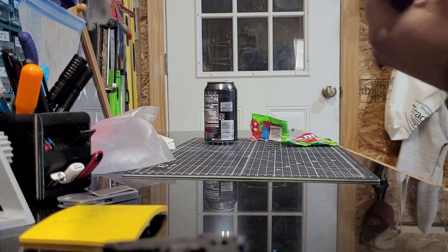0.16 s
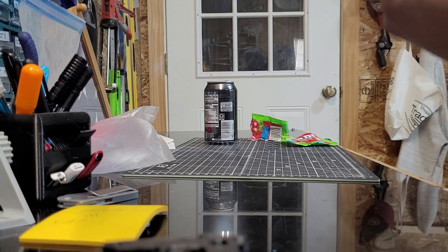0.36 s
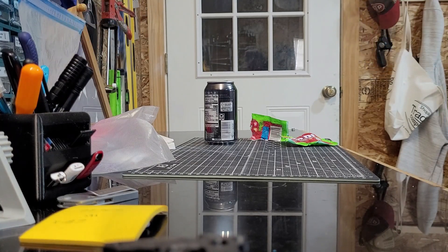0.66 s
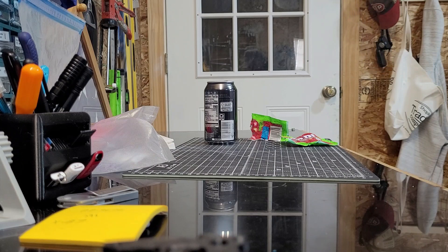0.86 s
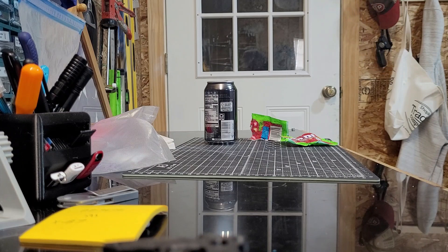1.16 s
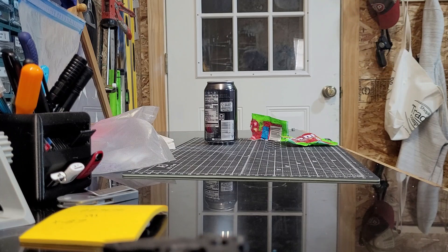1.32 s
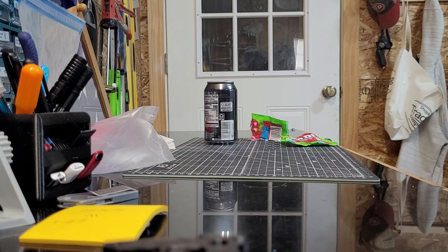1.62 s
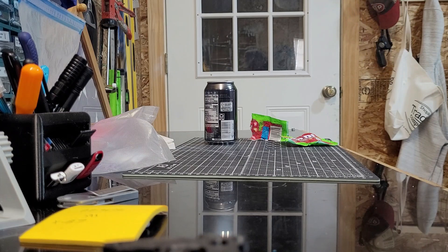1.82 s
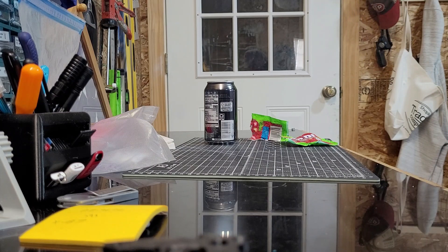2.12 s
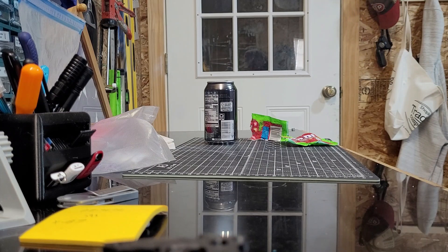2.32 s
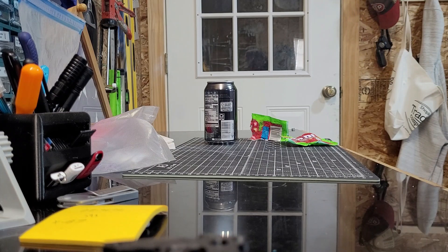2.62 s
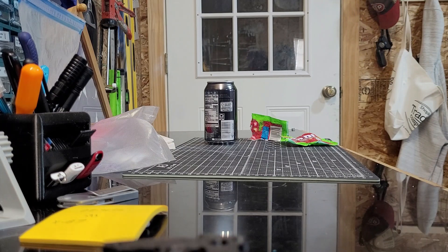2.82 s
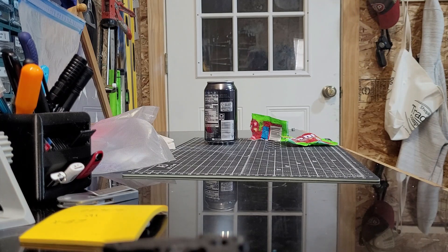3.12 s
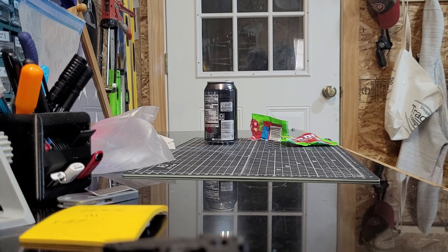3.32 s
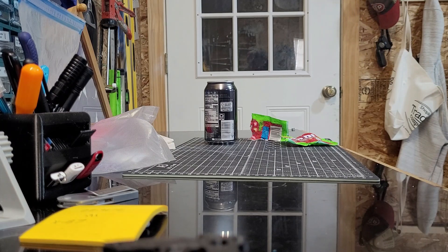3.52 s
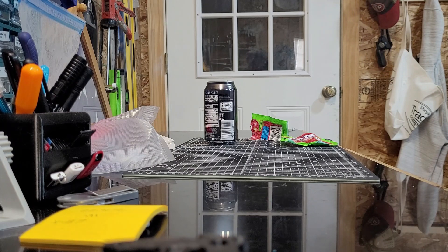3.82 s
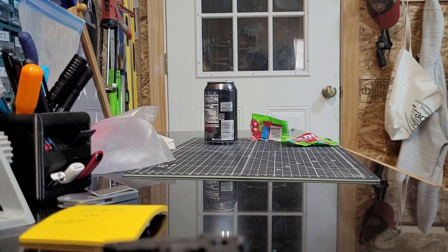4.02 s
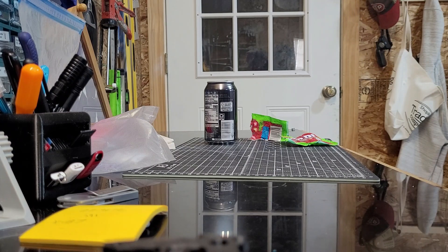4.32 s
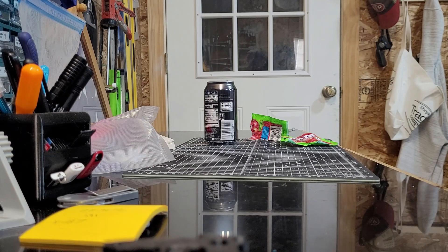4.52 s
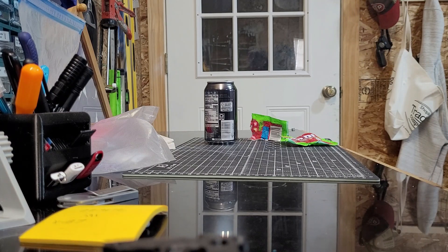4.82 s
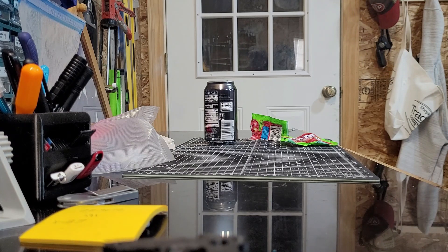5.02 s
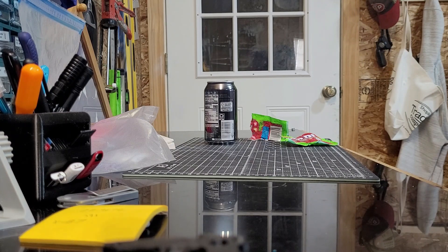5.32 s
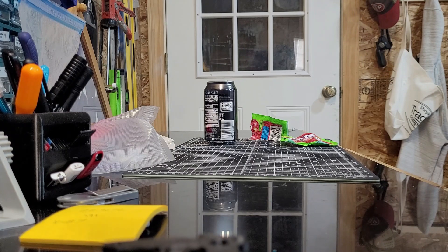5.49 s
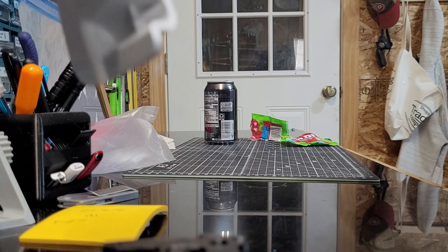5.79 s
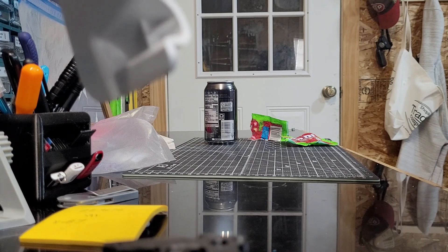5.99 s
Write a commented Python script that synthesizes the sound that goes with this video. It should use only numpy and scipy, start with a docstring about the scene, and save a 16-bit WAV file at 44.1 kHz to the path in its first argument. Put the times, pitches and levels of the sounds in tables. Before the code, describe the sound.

A steady low appliance drone fills a garage. Close by, fingers hiss faintly over smooth plastic and small sticky ticks come loose. A light plastic knock with a soft shelf thud comes early, then a few weaker taps at intervals. After a quiet spell, a tight burst of contacts snaps the bracket in place, by far the loudest event, with a short garage ring. Close stereo microphone.

```python
"""Hands turn a plastic bracket about and press it onto a shelf in a garage, heard from close by.
Over the drone of an appliance, shaped noise throughout, fingers slide on the plastic (hiss bursts)
and small sticky ticks come loose (short bright modes). From 1.2 s the bracket knocks on the shelf,
chatter ringing its modes, and near 5.9 s a dense run of contacts snaps it home loudly.
Sparse decaying reflections let the garage ring after each blow."""
import sys
import numpy as np
from scipy import signal
from scipy.fft import irfft
from scipy.io import wavfile
from scipy.ndimage import uniform_filter1d

SR = 44100
rng = np.random.default_rng(int(sys.argv[2]) if len(sys.argv) > 2 else 0)


def dump(signal):
    """Clip the signal to [-1, 1] and save it as 16-bit WAV at the path in sys.argv[1]."""
    limited = np.clip(np.atleast_2d(signal).T, -1, 1)
    pcm = np.round(limited * 32767).astype(np.int16)
    wavfile.write(sys.argv[1], SR, pcm)


N = 271215

# middles of the thud, shell, ribs and edges bands as the walls hear them: f/Hz
BANDS_HZ = [450, 1250, 3300, 10000]
PIVOT_HZ = 1210  # the brightness of a blow turns about this pitch


def blows():
    """At each contact a short chatter of tiny impacts rings the bracket, and one push thuds the shelf.

    The walls hear the part from all sides, so the room is also fed a click of smooth colour.
    """
    # blows on the bracket: t/s, strength/dB, shelf thud/dB, brightness/(dB per octave),
    # favoured pitch f/Hz, lean to the left/dB, room share/dB
    contacts = [(1.2315, -46.5, -43, -8, 900, -8, 5), (1.2415, -33.5, -28, -3, 2220, 1.5, -10),
                (1.2439, -40.5, -66, -2, 3320, 11, -6), (1.484, -58, -61, -4, 960, 0, 1),
                (1.5264, -54, -61, -4, 1390, 1, -9), (1.8749, -55.5, -61, -5, 950, -1, 3.5),
                (3.3272, -60, -46, -13, 2380, 0.5, -7), (3.3374, -46.5, -53, -7.5, 2900, -4, -10),
                (3.3438, -40.5, -47, -6, 1020, -2, -7), (3.362, -47, -55, -15, 2900, -9, -7),
                (3.7369, -42, -37.5, -7, 2640, 1, -6), (3.7395, -64, -36, 0, 1200, -5, -4),
                (4.1075, -55, -46.5, -9, 1900, -1, 1), (4.1203, -46.5, -58, -7, 1050, -5, -5),
                (4.1292, -48, -48, -20, 1540, -3, 1), (4.7305, -57.5, -54, 0.8, 1210, 2, 0.5),
                (5.904, -21.5, -32, -2, 4550, 5, 2.5), (5.9058, -23, -30, 2, 2350, 2, 1.8),
                (5.9078, -23, -26, 0.4, 1550, -7, -9), (5.9094, -26, -40, -0.7, 4700, 7, 2),
                (5.9108, -27.5, -41, 1, 12000, 11, -7), (5.9148, -27, -29, -15, 1540, -5, 0)]
    # modes of the bracket's shell, ribs and edges: f/Hz, level/dB, t60/s
    shell_modes = [(906, 4, 0.014), (1170, -2.5, 0.028), (1380, -9.5, 0.021), (1530, 1.5, 0.018)]
    rib_modes = [(1890, 2.5, 0.017), (2240, -2, 0.015), (2316, 0.5, 0.01), (2750, -3, 0.045),
                 (3026, -2, 0.032), (3356, 4, 0.012), (4130, -6, 0.028), (4560, 0.5, 0.021),
                 (5430, 2, 0.013)]
    edge_modes = [(6360, 4, 0.0054), (7230, 10, 0.0065), (8500, -18, 0.0017), (9460, -7, 0.012),
                  (11930, 11.5, 0.0027), (15100, -5, 0.0029), (13800, -4.5, 0.012)]
    # modes of the shelf: f/Hz, level/dB, t60/s
    shelf_modes = [(356, 2, 0.059), (511, -1, 0.05), (726, -1.5, 0.017)]
    chatter_fade_s, first_touch = 0.0032, 8.9  # the first touch is the hardest
    crack_db = 9  # the plain crack of the contact, heard directly
    wall_ring_db, wall_click_db = -13.5, 20  # what the walls get of the ring and of the plain click

    bracket_modes = shell_modes + rib_modes + edge_modes
    direct = np.zeros((2, N))
    feeds = np.zeros((4, 2, N))
    t = np.arange(600) / SR
    for k, (s, db, thud_db, bright_db, spot_hz, pan_db, room_db) in enumerate(contacts):
        feed = feeds[k % 4]
        common, opposed = rng.standard_normal((2, len(t))) * np.exp(-t / chatter_fade_s)
        chatter = common + 0.5 * opposed * [[1], [-1]]  # the two sides face different contact points
        chatter[:, 0] = first_touch
        chatter = energy_one(chatter)

        struck_modes = favour(bracket_modes, spot_hz, bright_db)
        bracket = gain_of(db) * ring(struck_modes, spread_db=2.5, apart=1.1)
        shelf = gain_of(thud_db) * ring(shelf_modes, spread_db=8.0, apart=0.26)
        # the shelf is too slow to follow the chatter
        near = signal.fftconvolve(bracket, chatter, axes=1)[:, :shelf.shape[1]] + shelf
        add(direct, s, near, pan_db)
        add(feed, s, gain_of(wall_ring_db + room_db) * near, 0)  # some modes still reach the walls

        bracket_bands_db = db + bright_db * np.log2(np.array(BANDS_HZ[1:]) / PIVOT_HZ)
        click = bare_click([thud_db, *bracket_bands_db])
        crack = signal.fftconvolve(click, chatter, axes=1)
        add(direct, s, gain_of(crack_db) * crack, pan_db)
        add(feed, s, gain_of(wall_click_db + room_db) * click, 0)
    # blows take turns among four random reflection sets, so the tails do not comb
    return direct + sum(garage(feed) for feed in feeds)


def favour(modes, spot_hz, bright_db):
    """Each blow has its own brightness, and a favoured pitch lifts the modes near it."""
    lift_db, reach = 11, 0.14  # reach in natural-log frequency
    struck = []
    for hz, db, t60 in modes:
        tilt_db = bright_db * np.log2(hz / PIVOT_HZ)
        spot_db = lift_db * np.exp(-(np.log(hz / spot_hz) / reach) ** 2)
        struck.append((hz, db + tilt_db + spot_db, t60))
    return struck


def ring(modes, spread_db, apart):
    """One impulse into the modes, their strengths scattered at random; each side hears other phases."""
    hz, db, t60 = np.transpose(modes)[:, :, None]
    t = np.arange(2000) / SR
    place, shift = rng.uniform(-1.12, 1, (2, len(modes), 1))
    sign = (-1) ** np.arange(len(modes))[:, None]
    onset = 1 - np.exp(-t * hz * 4)
    envelope = sign * gain_of(db + spread_db * place - 60 * t / t60) * onset
    sides = [envelope * np.sin(2 * np.pi * hz * t + side * apart * shift) for side in (-1, 1)]
    return np.array([side.sum(0) for side in sides])


def bare_click(levels_db):
    """A zero-phase click with the blow's broad colour but without single modes."""
    hz = np.fft.rfftfreq(512, 1 / SR)
    power = 0
    for db, middle in zip(levels_db, BANDS_HZ):
        band = np.exp(-(np.log((hz + 1) / middle) / 0.59) ** 2)
        power = power + gain_of(db) ** 2 * band / band.mean()
    click = np.fft.fftshift(irfft(np.sqrt(power)))[128:]  # its peak comes 128 samples in
    return np.tile(click, (2, 1))


def ticks():
    """Single tiny releases of skin and plastic letting go: a few bright modes that die within ms."""
    # sticky ticks: t/s, level/dB
    releases = [(0.5127, -53), (1.1807, -55), (1.435, -55), (1.838, -58), (1.8515, -57), (1.9147, -58),
                (1.932, -56), (1.9705, -53), (2.0755, -55), (4.317, -64), (4.3494, -61), (4.374, -61),
                (4.396, -55), (4.4172, -55.5), (4.4327, -56), (4.4564, -59), (5.317, -55)]
    # what a tick rings with: f/Hz, level/dB, t60/s
    modes = [(3970, -2, 0.0091), (5600, -15, .005), (7300, -5, 0.0082), (11000, -13, .005)]
    out = np.zeros((2, N))
    for s, db in releases:
        tick = gain_of(db) * ring(modes, spread_db=2.5, apart=1.0)
        add(out, s, tick, rng.standard_normal())  # scattered left and right by about 1 dB
    return out


def slides():
    """Skin hiss on smooth plastic, slightly grainy, at times ringing in the cupped hand."""
    # finger strokes: peak t/s, swell/s, fade/s, level/dB, tilt/(dB per octave),
    # ring of the cupped hand/dB, its pitch f/Hz
    strokes = [(.1, .25, 0.21, -81, -3, -28, 3300), (.29, .25, 0.14, -74.5, 0.5, -4, 3200),
               (.375, 0.11, .2, -77, -1.5, -8, 3180), (.62, 0.45, 0.44, -86.5, -6.5, -1, 3060),
               (.84, 0.13, 0.1, -77, -1, 7, 3040), (1.05, 0.78, 0.26, -87.5, 0, -10, 3110),
               (2.47, .08, 0.093, -86, -3.5, -2, 3180), (3.346, .03, 0.075, -73, -6, 8, 3020),
               (3.733, .04, .012, -81, -5, 0, 3090), (4.12, 0.037, 0.12, -76.5, -5.5, -4, 3130),
               (4.765, .02, .25, -91, 2, -5, 3300), (4.94, 0.1, 0.094, -74.5, -3.5, 9.5, 3280),
               (5.24, .11, .3, -91, -3, -10, 3150), (5.314, .12, .3, -92, -1, -9, 3250),
               (5.43, 0.13, .28, -89, -2.5, -8, 3200)]
    # colour of the skin hiss: f/Hz, level/(dB per Hz)
    skin_colour = [(880, -35), (1500, -10), (2320, -4.5), (3350, -8), (3620, -3.5), (7610, -6),
                   (8570, -10.5), (12900, -6.5), (16000, -11)]
    # air in the cupped hand: width/Hz, lift/dB
    hollow_width_hz, hollow_lift_db = (270, 0.5)
    stroke_drop_db = 20  # a stroke rises by this much in its swell time and falls by it in its fade time
    roundness = 1.13  # 1 = pointed stroke, 2 = rounded

    hz = np.fft.rfftfreq(512, 1 / SR)[:, None]
    t = np.arange(N // 128 + 5) * 128 / SR
    power = np.full((len(hz), len(t)), 1e-16)
    for s, swell_s, fade_s, db, tilt_db, hollow_db, hollow_hz in strokes:
        distance = np.maximum((s - t) / swell_s, (t - s) / fade_s)
        stroke_db = db - stroke_drop_db * distance ** roundness
        resonance = 1 / (1 + (2 * (hz - hollow_hz) / hollow_width_hz) ** 2)
        hollow = gain_of(hollow_db + hollow_lift_db) * resonance
        skin = gain_of(read(skin_colour, hz) + tilt_db * np.log2((hz + 100) / 8000))
        power = power + ((skin + hollow) * gain_of(stroke_db)) ** 2
    grain_db = 2.0 * rng.standard_normal(len(t))
    level_db = 10 * np.log10(power) + grain_db
    return noise(np.array([level_db + 1.0, level_db - 0.5]), same=0.079, turn=0.86, size=512)


def garage(x):
    """Sparse reflections of random sign, each band dying at its own speed."""
    # decay of the garage: f/Hz, t60/s
    decay = [(300, 0.25), (700, 0.47), (1400, 0.53), (4000, 0.51), (8000, 0.37), (12000, 0.32),
             (16000, 0.24)]
    # colour of its reflections: f/Hz, level/dB
    colour = [(200, 2), (500, -7), (1150, -8), (1450, -4.5), (3000, -1), (5000, -2), (7500, -4.5),
              (9000, -9), (12000, -4), (15500, -3.5)]
    taps = np.zeros((2, SR))
    # one reflection somewhere in every 20 samples
    at = np.arange(160, SR - 20, 20) + rng.integers(0, 20, (2, (SR - 161) // 20))
    np.put_along_axis(taps, at, rng.choice([-1., 1.], at.shape), 1)
    hz, t, z = signal.stft(taps, SR, nperseg=256)
    level_db = read(colour, hz)[:, None] - 60 * t / read(decay, hz)[:, None]
    early = 1 + 0.79 * np.exp(-t / 0.0032)  # shelf and bench throw back strong first echoes
    tail = signal.istft(z * gain_of(level_db) * early, SR, nperseg=256)[1]
    return signal.fftconvolve(x, tail / np.linalg.norm(tail[0]), axes=1)[:, :N]


def drone():
    """Appliance and air noise through the low resonances of the garage."""
    # slope of the drone: f/Hz, level/(dB per Hz)
    slope = [(12, -71), (20, -44), (36, -19.5), (71, -12.5), (117, 1.5), (188, -16), (255, -7.5),
             (285, -15), (360, -3.5), (424, -16.5), (481, -13.5), (517, -15.5), (1500, -32.5), (1950, -39),
             (3300, -120)]
    # its faint treble: f/Hz, level/(dB per Hz)
    treble = [(1500, -30), (1900, -30.5), (2350, -36.5), (2700, -40), (4500, -50.5), (5300, -54),
              (6200, -49.5), (7900, -51), (8300, -59), (12000, -57.5), (16000, -58)]
    # resonances: f/Hz, width/Hz, level above the slope/dB
    peaks = [(52.7, 18, 8.5), (110.7, 11.8, -6), (129.3, 3.1, 4.5), (273.6, 22, 3), (361.3, 20, 3),
             (610, 56, 5.5), (796, 9.4, 7.5), (1215, 71, 3.5), (1820, 170, 10), (7040, 200, 3.5)]
    # slow coming and going: t/s, level near 1 kHz/dB, level under 65 Hz/dB
    swell = [(0, 1, 1), (.3, 5, -3), (.7, 4, 7.5), (1.3, 1.5, 2), (2.2, 2.5, 2.5), (2.6, 1.5, -5),
             (3.2, 2, 1), (3.9, 2, -7.5), (4.6, 1.5, 0.5), (6.2, 1.7, -4)]
    # likeness of left and right: f/Hz, correlation
    likeness = [(60, 0.98), (150, 1), (380, 1), (950, 0.1), (2380, 0.077), (5980, -0.13), (15000, 0.13)]
    # lean to the left: f/Hz, level/dB
    lean = [(60, 0), (150, 3.5), (380, -1.0), (950, -3), (2380, 2.5), (5980, -0.5), (15000, 1)]
    drone_db, lag_s = -46.5, 0.000231  # the drone reaches the right side first

    hz = np.fft.rfftfreq(4096, 1 / SR)
    t = np.arange(N // 1024 + 5) * 1024 / SR
    shape_db = read(slope[:-1] + treble, hz)  # the treble takes over from the slope's last point
    for f, width, db in peaks:
        shape_db = shape_db + db / (1 + (2 * (hz - f) / width) ** 2)

    s, middle_db, deep_db = np.transpose(swell)
    middle = np.exp(-(np.log((hz + 1) / 1000) / 0.65) ** 2)[:, None]
    deep = 1 / (1 + (hz[:, None] / 65) ** 4)
    level_db = shape_db[:, None] + middle * np.interp(t, s, middle_db) + deep * np.interp(t, s, deep_db)

    drift = rng.standard_normal(level_db.T.shape)
    drift = uniform_filter1d(drift, size=10, axis=0)
    drift = uniform_filter1d(drift, size=12, axis=1)
    level_db += 1.22 * evened(drift).T  # patches of the drone come and go

    lean_db = read(lean, hz)[:, None] / 2
    turn = np.exp(-2j * np.pi * hz * lag_s)[:, None]
    same = np.clip(read(likeness, hz), -1, 1)[:, None]
    sides_db = np.array([level_db + lean_db, level_db - lean_db])
    return gain_of(drone_db) * evened(noise(sides_db, same, turn, size=4096))


def noise(level_db, same, turn, size):
    """Stereo noise from random short-time spectra; level_db is (sides, bins, frames), turn scales the left."""
    a, b, c, d = rng.standard_normal((level_db.shape[2], level_db.shape[1], 4)).T
    left = a + 1j * b
    right = same * left + np.sqrt(1 - same ** 2) * (c + 1j * d)
    z = np.array([left * turn, right]) * gain_of(level_db)
    return signal.istft(z, nperseg=size, noverlap=size * 3 // 4)[1][:, :N]


def add(mix, s, sound, pan_db):
    """Mixes a sound in at time s, leaning left for a positive pan and right for a negative one."""
    part = mix[:, round(s * SR):][:, :sound.shape[-1]]
    part += gain_of([[pan_db / 2], [-pan_db / 2]]) * sound[:, :part.shape[1]]


def read(points, hz):
    """A spectrum read on a log-frequency axis."""
    f, value = np.transpose(points)
    return np.interp(np.log(hz + 1), np.log(f + 1), value)


def gain_of(db):
    """Decibels to an amplitude factor."""
    return 10 ** (np.asarray(db) / 20)


def evened(x):
    """Scaled to rms 1."""
    return x / np.sqrt(np.mean(x ** 2) + 1e-20)


def energy_one(x):
    """Each side scaled to energy 1."""
    return x / np.linalg.norm(x, axis=1, keepdims=True)


def scene():
    """Hands and bracket with their room sound, over the drone."""
    small_room_db = -8.5  # room share of slides and ticks
    small = ticks() + slides()
    hands = blows() + small + gain_of(small_room_db) * garage(small)
    no_bass = signal.butter(2, 300, "high", fs=SR, output="sos")  # small parts radiate no bass
    return signal.sosfilt(no_bass, hands) + drone()


def record(dry):
    """The recorder's band limit: a steep low-pass at 16050 Hz."""
    low_pass = signal.firwin(201, 16050, window=("kaiser", 9), fs=SR)
    return signal.oaconvolve(dry, low_pass[None], "same")


dry = scene()
out = record(dry)
dump(out)
```